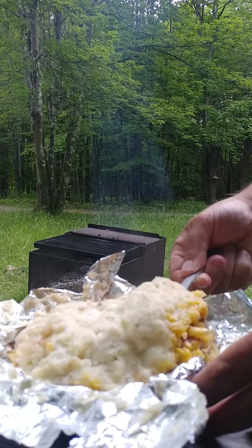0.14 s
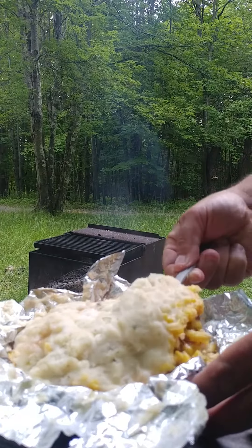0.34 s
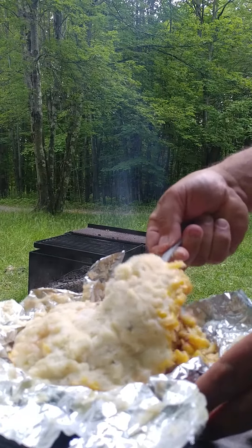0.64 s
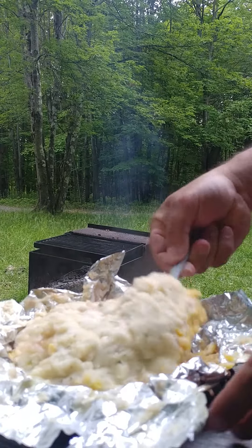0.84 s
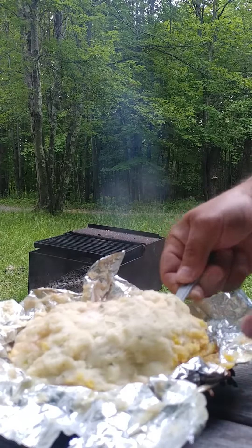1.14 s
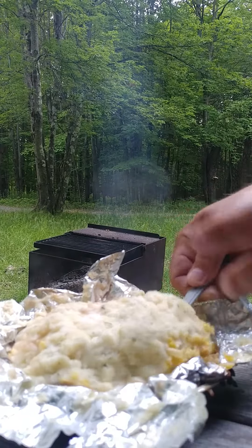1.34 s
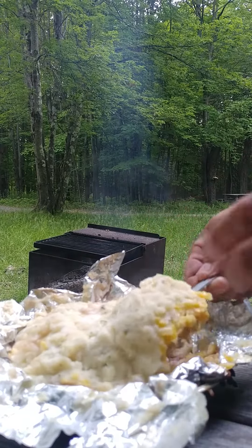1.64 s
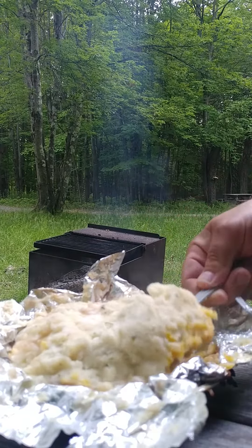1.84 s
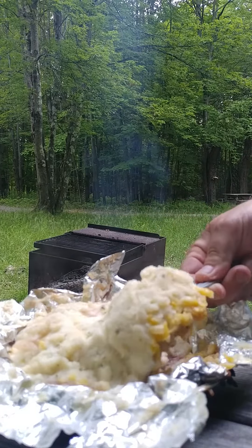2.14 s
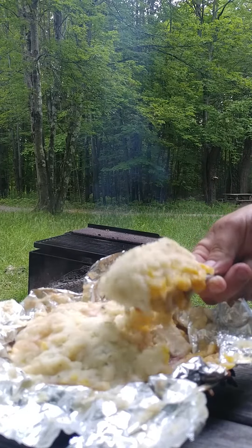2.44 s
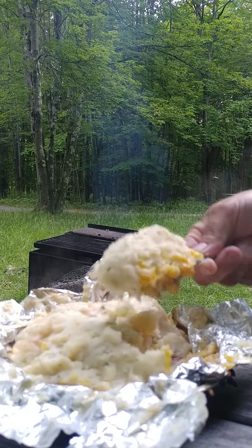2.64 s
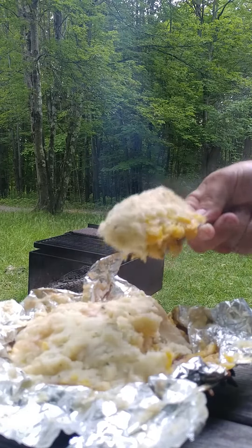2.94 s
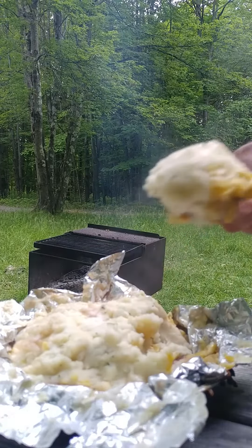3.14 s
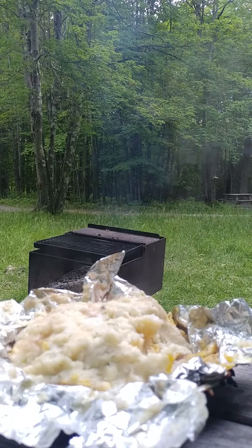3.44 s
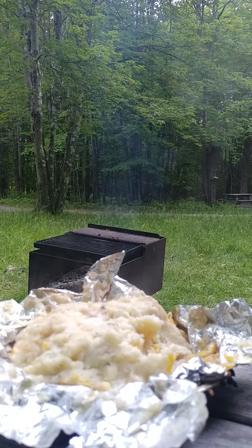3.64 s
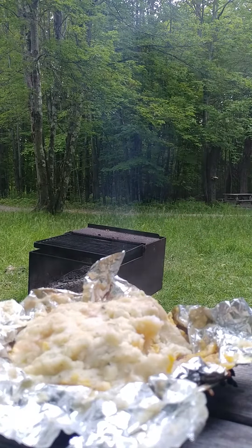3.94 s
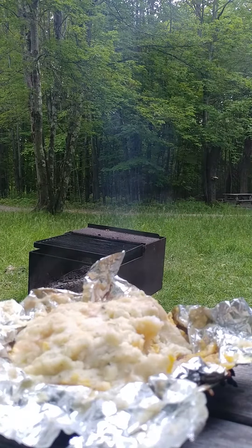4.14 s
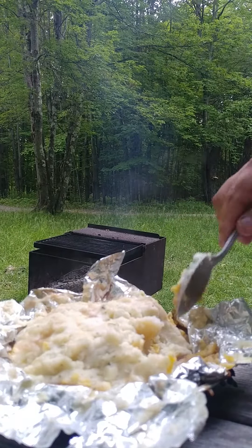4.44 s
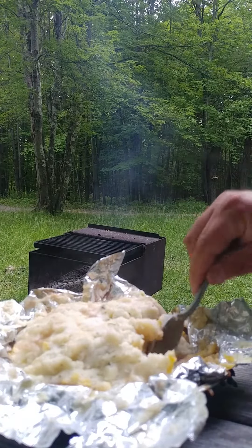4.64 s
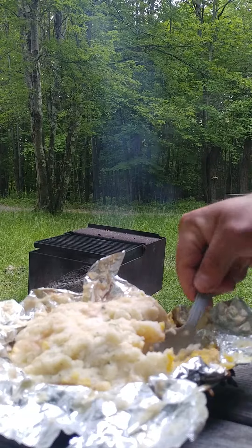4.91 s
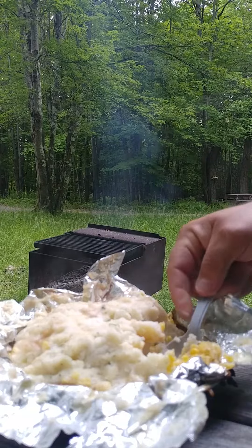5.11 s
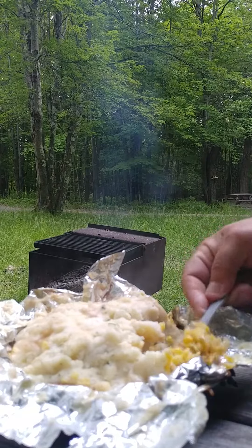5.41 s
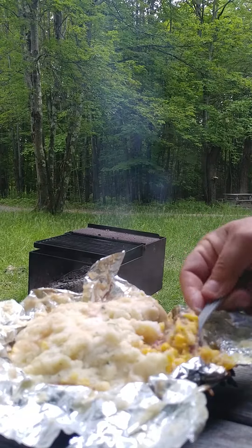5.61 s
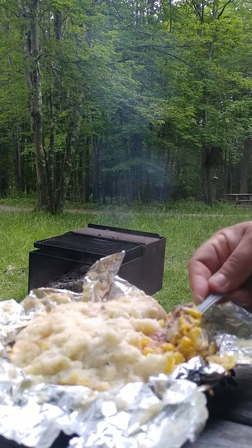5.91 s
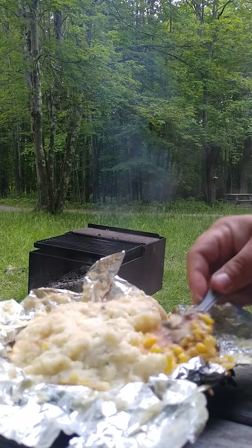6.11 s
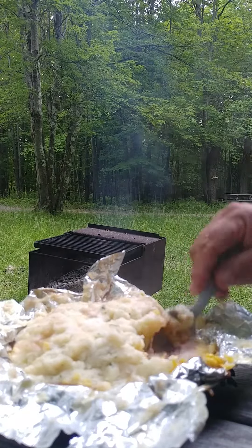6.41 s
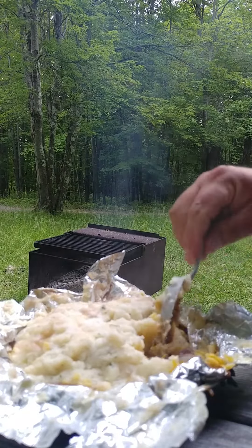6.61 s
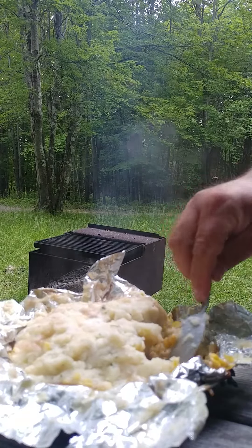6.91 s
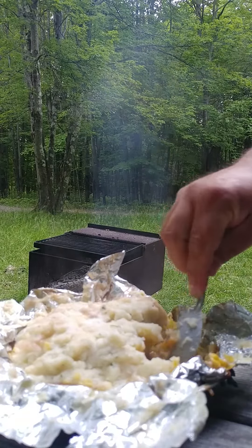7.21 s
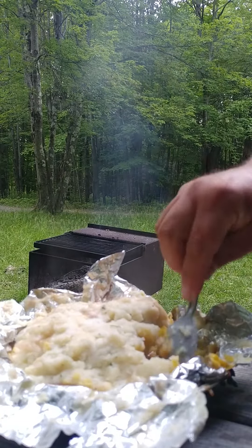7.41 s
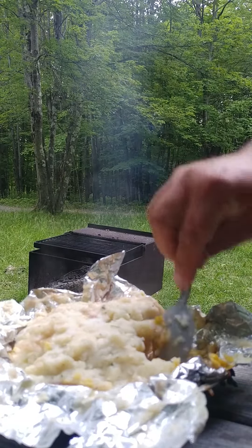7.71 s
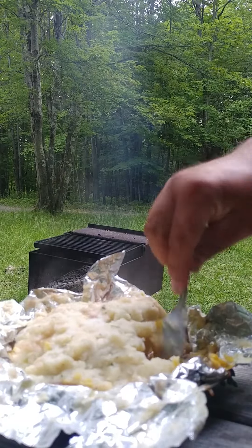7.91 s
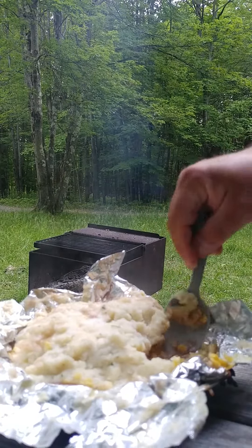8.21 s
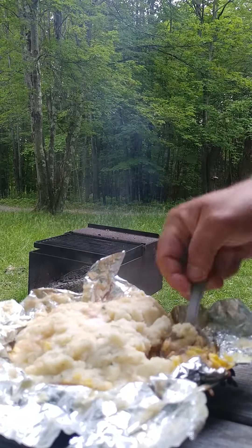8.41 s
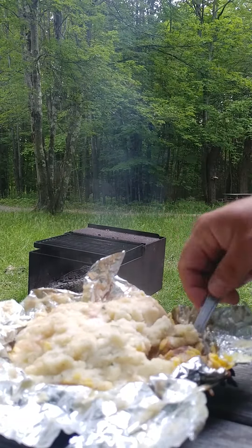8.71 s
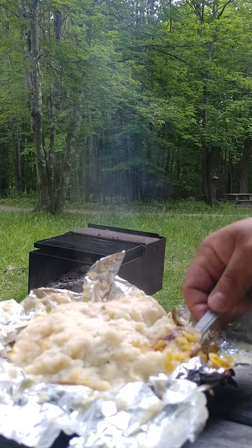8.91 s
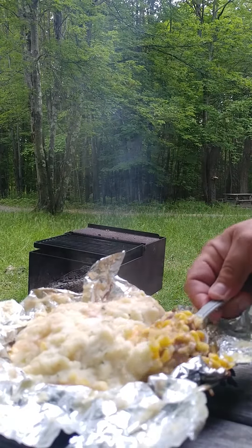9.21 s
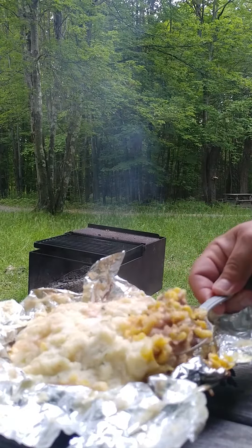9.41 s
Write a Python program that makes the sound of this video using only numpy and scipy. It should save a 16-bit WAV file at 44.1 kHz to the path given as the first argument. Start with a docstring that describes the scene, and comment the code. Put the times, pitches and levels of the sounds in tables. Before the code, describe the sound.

A metal spoon digs through crinkling foil outdoors, then knocks hard on a plate with a clanking ring, before more crisp foil snaps.

```python
"""A spoon digs food out of a foil packet on a camp table, close to a phone, and knocks it off on a plate to one side.
Creases in the foil snap and rustle: buckling noise drives five ranges of resonances in the sheet.
The plate rings as decaying sines with a steel tick at each knock; gritty noise adds rubbing and a short clatter.
The table thuds as low resonant noise; the trees answer foil and plate with a blurred echo.
Behind it all lie faint wind and hiss, shaped noise, and two thin far whistles, near-pure tones."""
import sys
import numpy as np
from scipy import signal
from scipy.fft import rfft, irfft
from scipy.io import wavfile
from scipy.ndimage import uniform_filter1d

SR = 44100
rng = np.random.default_rng(int(sys.argv[2]) if len(sys.argv) > 2 else 0)


def file_out(sig):
    """Save sig as 16-bit WAV at sys.argv[1]."""
    # one column per channel
    cols = np.atleast_2d(sig).T
    # limit, then scale
    lim = np.clip(cols, -1, 1)
    pcm = np.round(lim * 32767).astype(np.int16)
    wavfile.write(sys.argv[1], SR, pcm)


N = 421155
MS = 0.001  # one millisecond [s]
SIDES = np.array([[1], [-1]])  # left, right


def undb(db):
    """Amplitude factor of a level in dB."""
    return 10 ** (np.asarray(db) / 20)


def unit(x):
    """Scale to rms 1."""
    return x / np.sqrt(np.mean(x ** 2))


def lean(db):
    """Left and right gains that differ by db, positive to the left."""
    return undb(SIDES * db / 2)


def ring(x, hz, width_hz):
    """Two-pole resonance, gain 1 at the centre."""
    return signal.lfilter(*signal.iirpeak(hz, hz / width_hz, fs=SR), x)


def body(x, modes):
    """Sum of resonances, each applied twice for steep skirts; white noise of rms 1 comes out at rms 1."""
    def play(v):
        out = 0
        for k, (hz, width_hz, db) in enumerate(modes):
            twice = ring(ring(v, hz, width_hz), hz, width_hz)
            out = out + (-1) ** k * undb(db) * twice  # neighbours in opposite phase
        return out

    energy = np.sum(play(signal.unit_impulse(SR // 4)) ** 2)
    return play(x) / np.sqrt(energy)


def crackle(size, grain, spread_db):
    """Noise whose strength jumps every grain samples with long-tailed sizes: many tiny buckles."""
    sizes = np.minimum(rng.exponential(size=size // grain + 1), 4)
    strength = np.repeat(undb(spread_db * sizes), grain)[:size]
    return unit(strength * rng.standard_normal(size))


def walk(rate):
    """Random levels held 1 / rate s and slewed twice; spread near 1."""
    k = int(SR / rate)
    held = np.repeat(rng.standard_normal(N // k + 1), k)
    return 1.3 * uniform_filter1d(uniform_filter1d(held, k), k)[:N]


def swell(t, swell_ms, fade_ms):
    """Bell-shaped rise to the peak at t = 0, then an exponential fade."""
    return np.exp(-np.where(t < 0, (1000 * t / swell_ms) ** 2, 1000 * t / fade_ms))


def swells(rows):
    """Gain curve from rows of (loudest time [s], level [dB], swell [ms], fade [ms])."""
    t = np.arange(N) / SR
    return sum(undb(db) * swell(t - s, swell_ms, fade_ms) for s, db, swell_ms, fade_ms in rows)


def shaped(shape, noise):
    """Noise under an envelope, keeping the energy of the envelope."""
    return shape * noise * np.sqrt(np.sum(shape ** 2) / np.sum((shape * noise) ** 2))


def gains(tables, column):
    """Gain curve from dB tables, silent between them, with 15 ms fades at their ends."""
    t, out = np.arange(N) / SR, np.zeros(N)
    for rows in map(np.array, tables):
        to_nearest_end = np.minimum(t - rows[0, 0], rows[-1, 0] - t)
        edge = np.clip(to_nearest_end / 0.015, 0, 1)
        out += edge * undb(np.interp(t, rows[:, 0], rows[:, column]))
    return out


def ports(x):
    """The left microphone port rings in the treble; the right is shaded by the phone and one sample late."""
    port_hz, port_width_hz, added_ring_db, shade_hz = 8600, 2600, 7.5, 7300
    left = x[0] + undb(added_ring_db) * ring(x[0], port_hz, port_width_hz)
    right = signal.lfilter(*signal.butter(1, shade_hz, fs=SR), x[1])
    return np.array([left, np.roll(right, shift=1)])


def air():
    """Wind in the leaves and microphone hiss; the bass gusts, the treble stays smooth."""
    # spectrum of wind and hiss: (frequency [Hz], relative level per Hz [dB])
    air_colour = [(20, -26.5), (32, -18), (48, -2.5), (65, -4.5), (100, -5), (200, -13), (500, -17.5),
                  (1200, -23), (4000, -30), (8500, -30.5), (15500, -35.5)]
    # how alike the two ports hear it: (frequency [Hz], left-right likeness [0 to 1])
    air_likeness = [(60, 0.92), (200, 0.41), (600, 0.17), (1400, .02)]
    level_db, gust_db, gusts_per_s = -67, 2, 2
    log_hz = np.log(np.maximum(np.fft.rfftfreq(N, 1 / SR), 1))
    colour_hz, colour_db = np.array(air_colour).T
    alike_hz, likeness = np.array(air_likeness).T
    colour = undb(np.interp(log_hz, np.log(colour_hz), colour_db))
    alike = np.clip(np.interp(log_hz, np.log(alike_hz), likeness), 0, 1)
    mid, side = rfft(rng.standard_normal((2, N)))
    pair = irfft(colour * (np.sqrt(1 + alike) * mid + np.sqrt(1 - alike) * side * SIDES), N)
    bass = signal.sosfilt(signal.butter(2, 700, fs=SR, output="sos"), pair)
    gust = undb(gust_db * walk(gusts_per_s))
    return undb(level_db) * unit(pair + (gust - 1) * bass)


def whistles():
    """Thin far whistles, perhaps birds: near-pure tones that glide and swell unevenly."""
    # one list per whistle: (time [s], pitch [Hz], rms level before the throb [dB])
    whistle_notes = [
        [(3.27, 1910, -86), (3.33, 1905, -86.5), (3.63, 1820, -86)],
        [(7.7, 3207, -88), (7.8, 3190, -82.5), (8.06, 3156, -88.5)],
    ]
    throb_hz, throb_db = 18, 3
    t = np.arange(N) / SR
    hz = np.interp(t, *np.vstack(whistle_notes).T[:2])
    tone = np.sqrt(2) * np.sin(2 * np.pi * np.cumsum(hz) / SR)
    return tone * gains(whistle_notes, column=2) * undb(throb_db * walk(throb_hz))


def trees(x):
    """Scattered echoes that build up from the ring of trunks and die away; moving leaves blur their tones."""
    level_db, build_up_s, t60_s = -31.5, 0.061, 0.51
    centre_hz, width_hz, sway_s = 2400, 3000, 0.00013
    t = np.arange(SR) / SR
    envelope = (1 - np.exp(-(t / build_up_s) ** 2)) * undb(-60 * t / t60_s)
    scatter = rng.standard_normal((2, SR)) * envelope
    answer = ring(ring(scatter, centre_hz, width_hz), centre_hz, 2.4 * width_hz)
    answer = answer / np.sqrt(np.sum(answer ** 2) / 2)
    echo = signal.fftconvolve(x.mean(axis=0)[None], answer, axes=1)[:, :N]
    place = np.arange(N) + sway_s * SR * walk(240)  # the path length wobbles
    return undb(level_db) * np.array([np.interp(place, np.arange(N), e) for e in echo])


def table():
    """Low bumps carried by the boards; the two lowest modes boom under a leaning hand."""
    # resonances of the boards: (frequency [Hz], width [Hz], relative level [dB])
    board_modes = [(51.5, 40, 3), (102, 43, -1), (165, 200, 1), (354, 350, -9.5)]
    # shakes by hands and spoon:
    # (loudest time [s], level [dB], swell [ms], fade [ms], extra boom from a leaning hand [dB])
    thuds = [(1.2, -73, 91, 280, 10), (1.88, -74, 200, 33, 3.5), (2.76, -64, 13, 68, 6),
             (3.021, -48, 41, 29, -9), (3.644, -36.5, 9, 51.5, -3.5), (4.02, -60, 12, 110, -1.5),
             (4.31, -45, 41, 28.9, -16), (4.75, -55.5, 53.5, 89, -3), (4.9, -64.5, 51, 162, 4),
             (5.85, -66.5, 39, 225, 2.5), (6.37, -57.5, 29, 24, 9), (8.1, -65.5, 43, 123, 3.5),
             (8.319, -50, 69, 67, 2.5), (8.76, -57, 137, 55, -4.5), (9.57, -58.5, 48, 54, 4.5)]

    def pair(modes):
        mid = body(rng.standard_normal(N), modes)
        side = body(rng.standard_normal(N), modes)
        return mid + 0.6 * SIDES * side

    booms = [(s, db + boom_db, swell_ms, fade_ms) for s, db, swell_ms, fade_ms, boom_db in thuds]
    bumps = [row[:-1] for row in thuds]
    low = undb(-3.0) * swells(booms) * pair(board_modes[:2])
    return low + undb(-2.0) * swells(bumps) * pair(board_modes[2:])


def plate():
    """Each knock is a steel tick and starts the modes around its own pitch; rubbing and clatter add grit."""
    # spoon on the plate: (time [s], level [dB], most excited pitch [Hz], narrowness [dB per octave squared],
    # contact [ms], left minus right [dB], tick level [dB], left hears later by [ms])
    knocks = [(3.013, -24.5, 447, 10.5, 0.71, -12, -57.5, -0.14),
              (3.643, -3.5, 1286, 2.24, 0.34, 2, -24, .13), (4.0154, -39, 455, 18, 0.18, -17, -66, -0.097),
              (4.3029, -25, 685, 5, 0.11, -5.5, -65, -0.027)]
    # ringing of the plate: (frequency [Hz], relative level [dB], t60 [s], left minus right [dB])
    plate_modes = [(141, -19, 0.37, 1), (317, -16.5, 0.17, 6.5), (400, -19, 0.08, 2),
                   (482, -14, 0.075, 5.5), (615, -14.5, 0.07, -3), (700, -12, 0.09, -3),
                   (805, -10, 0.094, -2.5), (896, -6, 0.075, -4), (1132, -14.5, 0.08, -3.5),
                   (1317, -11, 0.07, 3), (1536, -4, 0.053, 0), (1576, -5.5, 0.05, 3.5),
                   (1760, -16.5, 0.061, 2), (2094, -6.5, .035, 5.5), (2235, -11, 0.029, 5.5),
                   (2780, -21.5, 0.05, 6), (2940, -21, 0.04, 5.5), (3125, -13.5, 0.055, 5),
                   (3420, -16, 0.026, 6)]
    # ringing of the spoon: (frequency [Hz], width [Hz], relative level [dB])
    spoon_modes = [(3989, 2000, 2.5), (6194, 500, -2.5), (8350, 1300, 1)]
    # gritty rubbing and the short clatter of the hardest knock:
    # (loudest time [s], level [dB], swell [ms], fade [ms])
    grit_swells = [(3.02, -41, 24.6, 16.6), (3.645, -25.5, 5.3, 21), (4.015, -50.5, 1.8, 20),
                   (4.16, -65.5, 41, 36), (4.255, -51, 13.7, 28), (4.3, -46, 26, 21)]
    # one squeak of the spoon's edge: (loudest time [s], level [dB], swell [ms], fade [ms])
    squeak_swell = (3.097, -61, 14, 10)
    # its fundamental and overtones in turn: relative level [dB]
    squeak_overtones = [0, -5, -10]
    squeak_hz, squeak_width_hz = 3000, 450
    out, t = np.zeros((2, N)), np.arange(SR // 3) / SR
    for s, db, centre_hz, narrow_db, contact_ms, pan_db, tick_db, late_ms in knocks:
        i, contact_s = int(s * SR), contact_ms * MS
        tick_fade_s = 0.0025 + 1.3 * contact_s  # a softer contact drags the tick out
        tick_fade = np.exp(-t / tick_fade_s) + undb(-23.5) * np.exp(-t / 0.016)
        tick = rng.standard_normal(len(t)) * (1 - np.exp(-t / contact_s)) * tick_fade
        out[:, i:i + len(t)] += undb(tick_db) * lean(8.0) * body(tick, spoon_modes)
        heard = np.maximum(t - np.maximum(SIDES * late_ms, 0) * MS, 0)  # time since arrival at each port
        contact = 1 - np.exp(-(heard / contact_s) ** 2)
        for hz, mode_db, t60, side_db in plate_modes:
            # modes below 1 kHz start in opposite phase
            tone = np.sign(hz - 1000) * contact * np.sin(2 * np.pi * hz * heard) * undb(-60 * t / t60)
            reach_db = -narrow_db * np.log2(hz / centre_hz) ** 2
            out[:, i:i + len(t)] += undb(db + mode_db + reach_db) * lean(pan_db + side_db) * tone
    grit = swells(grit_swells) * crackle(size=N, grain=60, spread_db=3.0)
    # grit favours the low modes, by 14 dB per octave
    grit_modes = [(hz, 12.0 / t60, db - 14 * np.log2(hz / 1000)) for hz, db, t60, _ in plate_modes[1:]]
    squeak_modes = [(k * squeak_hz, k * squeak_width_hz, db) for k, db in enumerate(squeak_overtones, 1)]
    gritty_plate = lean(-6.0) * body(grit, grit_modes)
    gritty_spoon = undb(-28.5) * body(grit, spoon_modes)
    squeak = body(swells([squeak_swell]) * rng.standard_normal(N), squeak_modes)
    return out + gritty_plate + gritty_spoon + squeak


def ranges_db(db, weight_db, fold_hz, deep_db, bright_db, top_db):
    """Levels of the five ranges: a heavier push drives deep and body, a higher fold sheds more top and sizzle."""
    octaves = np.log2(fold_hz / 4390)  # from a middling fold
    top = top_db + 15 * octaves
    sizzle = top_db - 14 + 30 * octaves
    return db + np.array([weight_db + deep_db, weight_db, bright_db, top, sizzle])


def shove(push, i, burst, range_db, fold_hz, panel_hz):
    """Add one event to the ranges; the panel in play rings in the low two, its fold in the bright one."""
    panel = 0.43 * burst + 0.61 * ring(burst, panel_hz, 0.4 * panel_hz)
    fold = burst + 2.8 * ring(burst, fold_hz, 0.24 * fold_hz)
    ranges = np.array([panel, panel, fold, burst, burst])
    push[:, :, i:i + burst.shape[1]] += undb(range_db)[:, None, None] * ranges


def foil():
    """Snaps and crunches push the five ranges of the sheet with buckling noise."""
    # creases that snap: (time [s], level [dB], fold ring [Hz], panel ring [Hz],
    # weight of the push [dB], left minus right [dB])
    snaps = [(0.21, -59, 5600, 750, -5, -1), (0.6792, -45, 3120, 1160, -17, 13),
             (.7592, -45, 2680, 1300, -10, -11), (1.174, -34.5, 4420, 1270, -6.5, 7.5),
             (1.2443, -48, 3900, 1150, -11, 7), (1.28, -44, 3720, 740, -3.5, 3),
             (1.7399, -37.5, 4500, 700, -19, 17), (1.747, -25.5, 4760, 650, -17.5, 4),
             (1.749, -36.5, 4460, 736, -8.5, 7), (1.8161, -56, 6850, 955, -1, 3.5),
             (1.853, -48, 4400, 750, -21, -2), (1.872, -31, 4760, 1380, -13, 2.5),
             (1.914, -46.5, 3750, 845, -22, 6), (2.3787, -44.5, 4330, 1250, -9, -3),
             (2.413, -44, 4470, 1700, -6.5, 3), (2.4248, -38, 4730, 1400, -14.5, -3.5),
             (2.595, -62, 6900, 1300, -12, 3), (3.5603, -63, 6970, 1214, -9, 6.5),
             (3.684, -48, 6520, 700, 14, 6), (4.645, -68.5, 2800, 892, 9.5, -5.5),
             (4.698, -54, 5920, 993, -11, 2), (4.7226, -50, 3140, 875, 5.5, -1),
             (4.738, -61, 6500, 1200, 3.5, -10), (4.78, -69.5, 2800, 895, 12, -3.5),
             (4.8435, -47, 3200, 1910, -10, -4), (4.8556, -57, 3060, 2020, 7, 12),
             (4.864, -43.5, 3480, 2100, 1, -2), (4.8683, -39, 3040, 2070, -3, -10),
             (4.878, -44, 2700, 1900, 1, -3), (4.892, -52.5, 2780, 1480, 10.5, 0),
             (4.954, -54.5, 4730, 1500, -16, -8), (4.964, -52, 4500, 1500, -19, -7),
             (5.049, -58.5, 5200, 750, 0.5, -6), (5.0765, -36, 4300, 804, -10, 10.5),
             (5.0831, -36, 4430, 720, -0.5, 0), (5.1783, -54.5, 6000, 800, -11, 2),
             (5.199, -37.5, 5170, 775, -8, 2), (5.270, -51, 5000, 800, -2, 2),
             (5.9416, -52, 4770, 998, -3.5, -0.5), (5.959, -49, 4390, 1302, -6, 6.5),
             (5.9771, -44, 6020, 1490, -1, -6.5), (5.9826, -32, 5830, 1437, -14.5, 16.5),
             (5.9914, -30, 5090, 1496, -18.5, 4), (6.062, -58.5, 5120, 793, -21, 9),
             (6.3564, -38.5, 3350, 1480, -5.5, 17), (6.3629, -22.5, 4250, 1110, -15.5, 5.5),
             (6.7, -44, 5700, 1393, -13.5, 4.5), (6.709, -54, 6180, 1408, -23, 6),
             (8.0731, -33.5, 3160, 1100, -3.5, 4), (8.0811, -32, 3300, 1400, -10.5, -11),
             (8.1294, -21.5, 2350, 1630, -11, 11), (8.2296, -50, 3100, 1252, 9, 3),
             (8.4071, -64.5, 2980, 1400, 7.5, -2), (8.4552, -40, 2800, 1502, -5, -4),
             (8.5194, -32.5, 3270, 1430, -13, -6), (8.5333, -43, 2880, 846, -18, 6),
             (8.6321, -33.5, 5510, 1463, -15.5, 3.5), (8.646, -47, 5550, 1377, -13, -6),
             (8.6683, -40.5, 3970, 1390, 4, 5.5), (8.685, -51, 6000, 1400, -16, 6),
             (8.7261, -48, 4360, 860, -2.5, -4), (8.752, -55, 4500, 1100, 6, -4),
             (8.785, -36.5, 4870, 1518, -17, 0), (8.822, -51.5, 6000, 1200, -6, 0),
             (8.8674, -44.5, 2760, 1260, -11, 11)]
    # strokes of the spoon that crunch many creases: (loudest time [s], swell [ms], fade [ms], level [dB],
    # fold ring [Hz], weight of the push [dB])
    crunches = [(.682, 15, 11, -63.5, 4400, 7), (0.76, 8.6, 14, -60.5, 2700, -0.5),
                (1.151, 18, 75, -74, 4500, 6.5), (1.178, 9.2, 14, -52, 4660, -2.5),
                (1.251, 17, 39, -64.5, 4270, -1.5), (1.283, 14, 9.1, -60, 5050, 4),
                (1.336, 21, 11, -60, 3640, -3), (1.751, 31, 29, -65.5, 5100, -0.5),
                (1.881, 70, 110, -71, 4850, 1), (2.034, 8.2, 10, -67.5, 3960, -9),
                (2.411, 45, 27, -65.5, 4400, -8.5), (4.716, 17, 30, -69, 5200, 1.5),
                (4.875, 32, 55, -61, 2890, 4.5), (4.965, 19, 9.5, -67, 3650, -8),
                (5.082, 21.3, 14, -52, 4700, 1), (5.2, 12.5, 42, -55.5, 4900, 0),
                (5.327, 41.5, 36, -67.5, 5300, -11), (5.631, 40, 23, -67.5, 5000, -7.5),
                (5.994, 17.4, 18, -54, 4960, -8), (6.086, 54, 16, -66.5, 4800, -13),
                (6.335, 2.1, 3, -60.5, 3270, -3), (6.347, 5.4, 8.8, -38, 2720, -7),
                (6.719, 18.6, 17, -57.5, 3300, -10.5), (6.852, 17.4, 35, -72.5, 4570, -0.5),
                (7.645, 8.7, 12, -73, 5400, -15), (8.101, 2.2, 5.3, -53.5, 2900, 1),
                (8.1233, 3.2, 3.9, -26, 3870, -22), (8.151, 30, 50, -54, 3300, 0),
                (8.25, 21, 36, -49.5, 3270, -2.5), (8.32, 42, 42, -74, 3000, 12),
                (8.43, 41, 110, -73, 2980, 9), (8.54, 20, 22, -66.5, 4200, -6.5),
                (8.601, 22, 73, -69, 4020, 3.5), (8.671, 11, 10.8, -50, 4100, 1),
                (8.795, 34, 27.5, -51.5, 4900, -1.5), (8.875, 24, 17, -60.5, 3800, -2.5),
                (9.272, 4, 5.9, -72, 5460, 1)]
    # crumpled sheet, one list per range (deep, body, bright, top, sizzle):
    # (frequency [Hz], width [Hz], relative level [dB])
    sheet_ranges = [
        [(406.2, 1000, -5), (767.5, 510, 2.5)],
        [(1420, 440, 2), (2233, 800, -2.5)],
        [(2794, 350, 0), (3360, 580, -2), (4650, 1500, -1), (6200, 2200, -6)],
        [(8420, 2600, -0.5), (8900, 1700, 3)],
        [(12000, 1200, 0.5), (13990, 2200, 0)],
    ]
    # the same ranges in turn: left minus right [dB]
    range_lean = [-5.5, 0.5, -1.5, -1.5, -0.5]
    push = np.zeros((len(sheet_ranges), 2, N))

    t = np.arange(-SR // 5, SR // 5) / SR
    panels = np.array(snaps)[:, [0, 3]]
    for s, swell_ms, fade_ms, db, fold_hz, weight_db in crunches:
        shape = swell(t, swell_ms, fade_ms)
        mid, side = (shaped(shape, crackle(size=len(t), grain=130, spread_db=3.5)) for _ in range(2))
        burst = mid + 0.6 * side * SIDES
        panel_hz = panels[np.argmin(abs(panels[:, 0] - s)), -1]  # the panel that snaps nearest in time
        levels = ranges_db(db, weight_db, fold_hz, deep_db=2.5, bright_db=-7.0, top_db=-9)
        shove(push, int(s * SR) - SR // 5, burst, levels, fold_hz, panel_hz)

    t = np.arange(SR // 10) / SR
    for s, db, fold_hz, panel_hz, weight_db, pan_db in snaps:
        fade_s = 3.7 * MS * undb(0.54 * weight_db)  # a heavier push lasts longer
        fade = np.exp(-t / fade_s) + undb(-26.0) * np.exp(-t / (6 * fade_s))
        shape = (1 - np.exp(-t / 0.00072)) * fade
        click = 0.77 * np.exp(-t / 0.0003)  # the crease yields with one sharp step
        burst = shaped(shape + click, crackle(size=len(t), grain=12, spread_db=2.5)) * lean(pan_db)
        levels = ranges_db(db, weight_db, fold_hz, deep_db=-1, bright_db=-11.5, top_db=-9.5)
        shove(push, int(s * SR), burst, levels, fold_hz, panel_hz)

    # the sheet relaxes with faint stray ticks, about six a second, in the bright and top ranges
    settling = (rng.random(N) < 6 / SR) * rng.standard_normal(N)
    tick_shape = np.convolve(abs(settling), np.hanning(150), "same")
    push[2:4] += undb(-78) * tick_shape * rng.standard_normal(N)
    return sum(body(p, modes) * lean(db) for p, modes, db in zip(push, sheet_ranges, range_lean))


def scene():
    """Foil and plate with their echo pass the two ports; table, whistles and air are added after them."""
    no_deep_bass = signal.butter(2, 120, "high", fs=SR, output="sos")  # small objects radiate none
    near = signal.sosfilt(no_deep_bass, foil() + plate())
    return ports(near + trees(near)) + table() + whistles() + air()


def record(dry):
    """Peaks clip at full scale; a steep low-pass cuts the top above 16 kHz."""
    low_pass = signal.ellip(10, 0.2, 80, 16000, fs=SR, output="sos")
    return signal.sosfilt(low_pass, np.clip(dry, -1, 1))


dry = scene()
out = record(dry)
file_out(out)
```